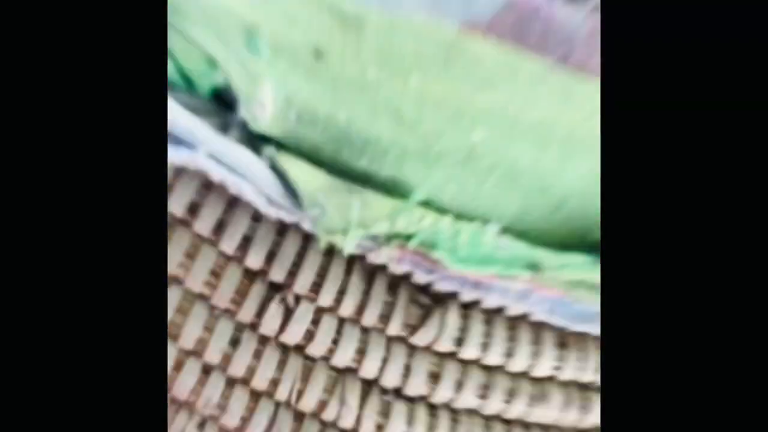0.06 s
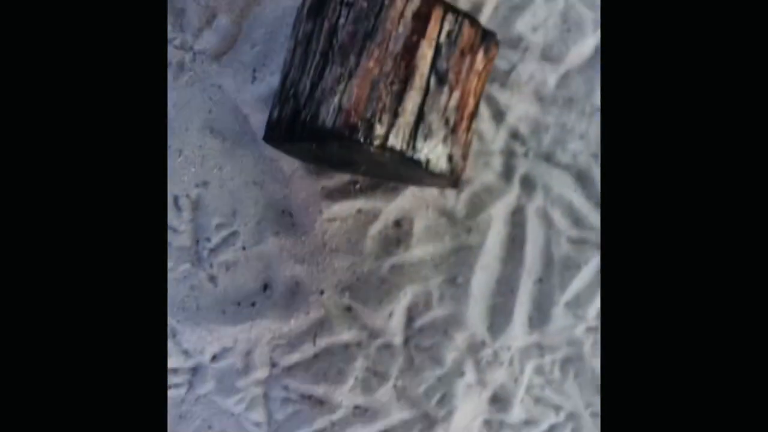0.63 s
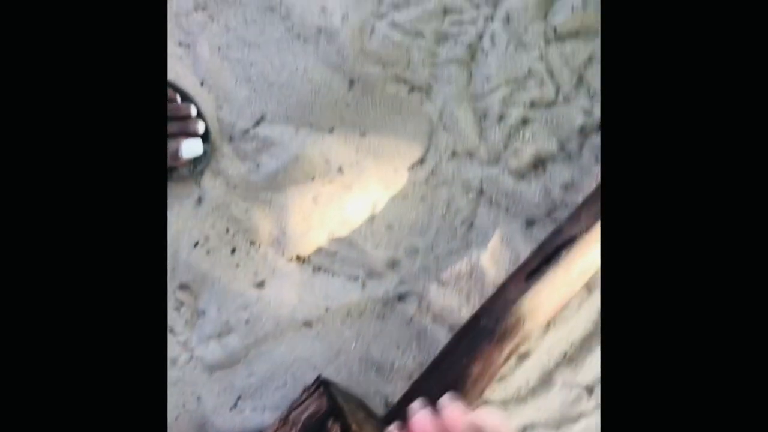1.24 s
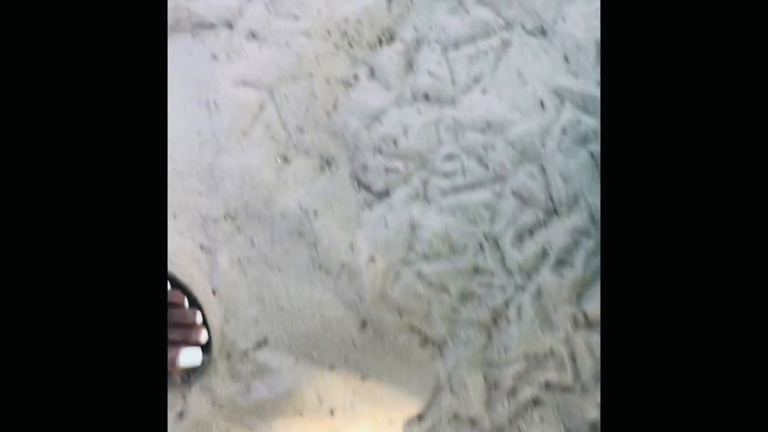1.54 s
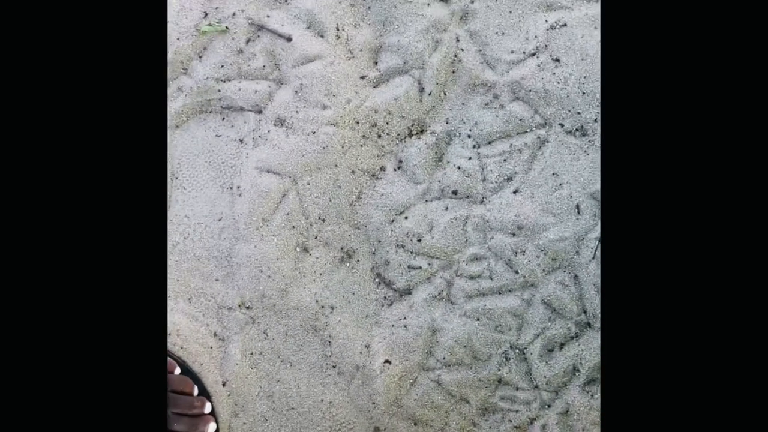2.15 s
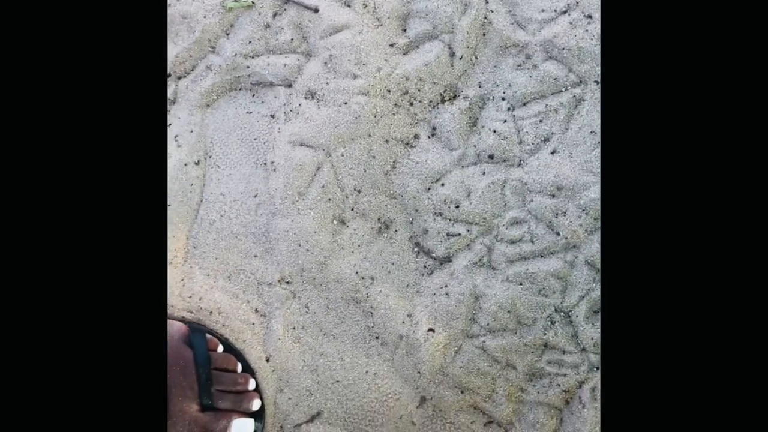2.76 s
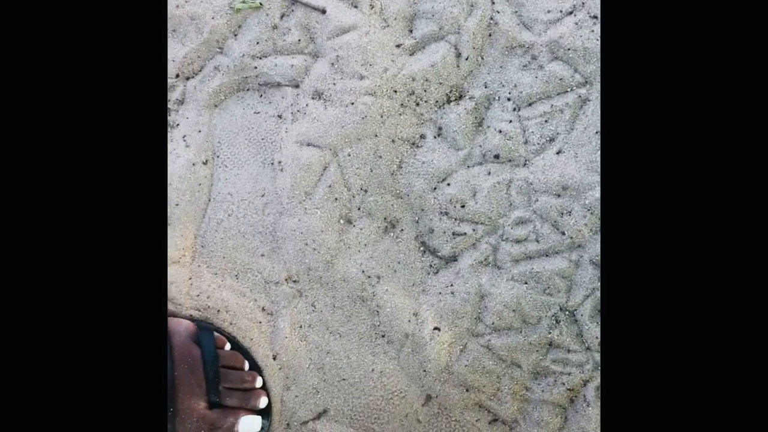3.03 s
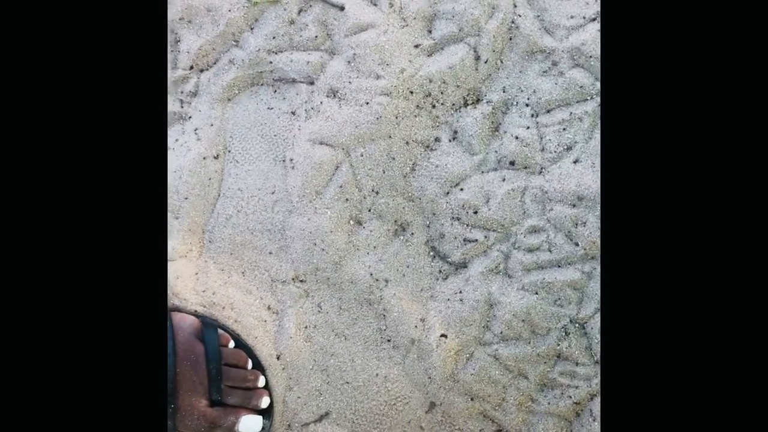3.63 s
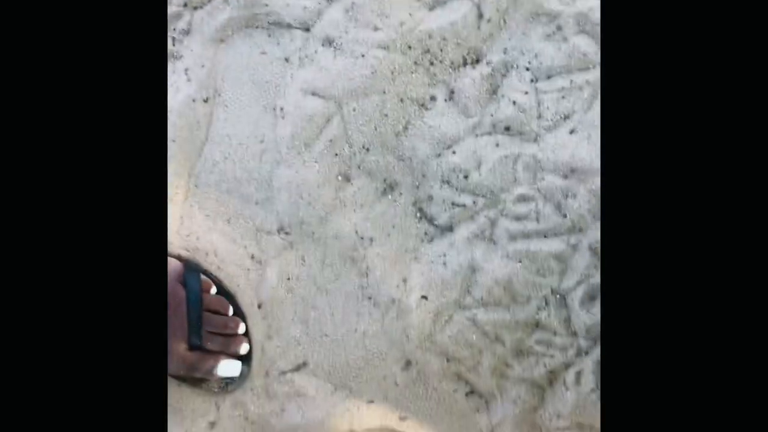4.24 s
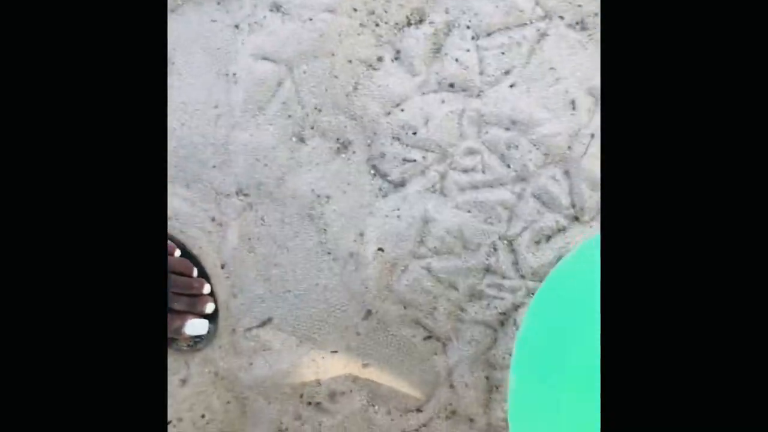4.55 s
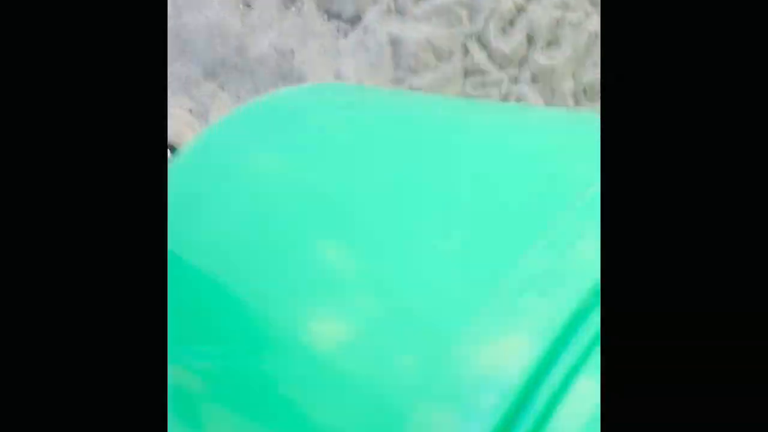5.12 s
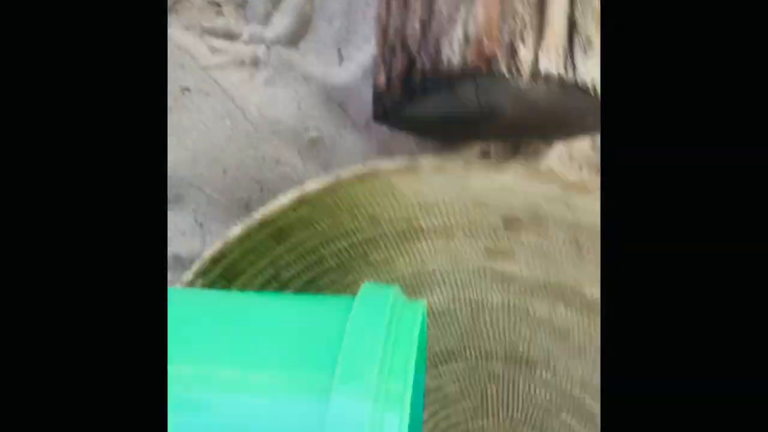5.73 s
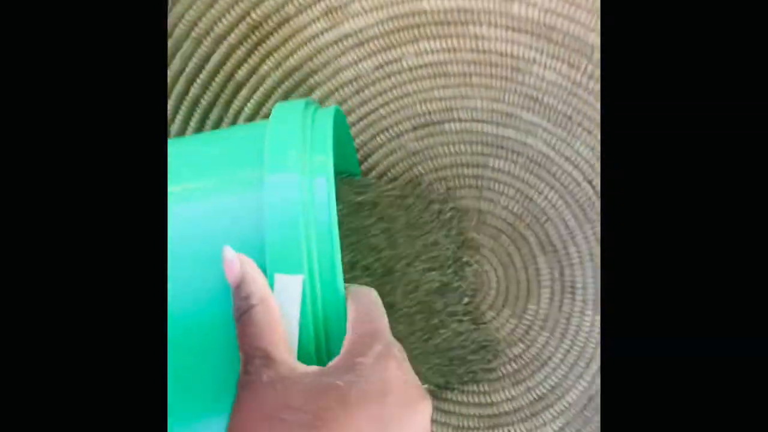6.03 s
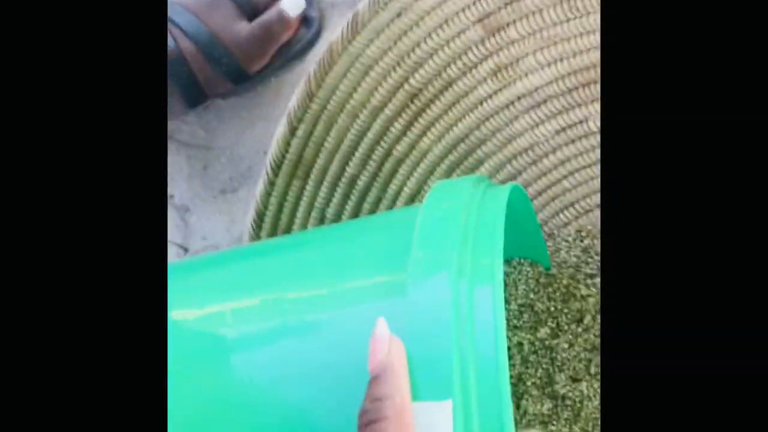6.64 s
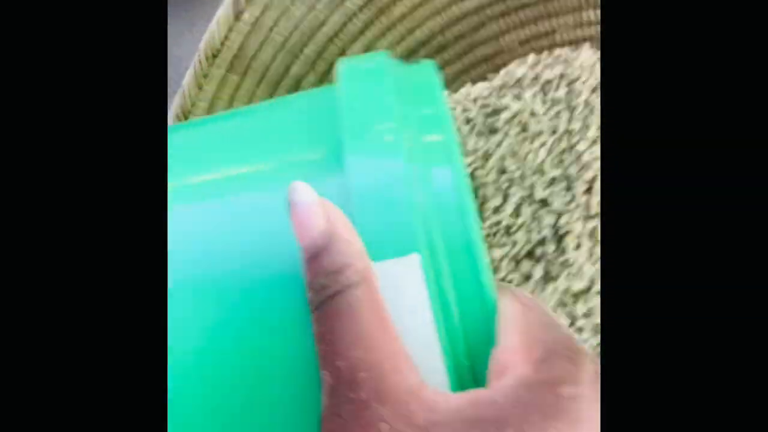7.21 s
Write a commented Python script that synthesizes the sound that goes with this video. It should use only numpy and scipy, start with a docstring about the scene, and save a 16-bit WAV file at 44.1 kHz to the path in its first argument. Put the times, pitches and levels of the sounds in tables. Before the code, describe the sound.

Light wind rumbles on a close microphone outdoors throughout. At about 0.3 seconds a woven grass basket is put down with a deep thump and a rustle of straw. A softer bump and rustle come near 1 second, then a sharp, squeaky snap at 1.4. From 2.1 to 2.9 seconds fingers knock irregularly on a plastic bucket, its thin wall booming, followed by small crackles. Around 3.5 seconds the bucket clatters in a quick run of hard hits, the loudest moment. A brief crackly scrape follows at 3.9 and a heavy, hollow thump at 4.6. From about 5.3 seconds wet grain starts sliding out with small ticks, surging into a hiss in the basket at 5.9. Lumps land with dull thuds until 6.5 and the flow thins. At 7.2 seconds the rest drops in one heavy slump with a bright hiss, fading by 7.5.

```python
"""Outdoors on sand, one microphone close to the work, light wind rumbling on it throughout.
A woven grass basket is put down with a thump and a rustle of straw. A plastic bucket is picked up:
its thin wall knocks and booms under the fingers, then it clatters and thumps. Last, wet millet
slides out of the tipped bucket, hisses into the basket and ends in one heavy slump."""
import sys
import numpy as np
from scipy import signal
from scipy.fft import rfft, irfft, next_fast_len
from scipy.io import wavfile
from scipy.ndimage import map_coordinates

SR = 44100
rng = np.random.default_rng(int(sys.argv[2]) if len(sys.argv) > 2 else 0)


def waveform_to_disk(signal):
    """Save audio, clipped to [-1, 1], as 16-bit WAV at the path in sys.argv[1]."""
    frames = np.transpose(np.atleast_2d(signal))
    scaled = np.clip(frames, -1, 1) * 32767
    samples = np.round(scaled).astype(np.int16)
    wavfile.write(sys.argv[1], SR, samples)


N = 329647


def amp(db):
    """Decibels to gain."""
    return 10 ** (np.asarray(db) / 20)


def unit(x):
    """Scale to rms 1."""
    return x / np.sqrt(np.mean(x ** 2) + 1e-20)


def along(points, hz):
    """Read (Hz, value) points on a log frequency axis."""
    point_hz, values = np.transpose(points)
    return np.interp(np.log(hz + 1), np.log(point_hz + 1), values)


def curves(rows):
    """One value per sample for each column after the time."""
    times, *columns = np.transpose(rows)
    return [np.interp(np.arange(N) / SR, times, column) for column in columns]


def wobble(rate):
    """A smooth random curve, rate knots a second."""
    knots = rng.standard_normal(int(N * rate / SR) + 4)
    return map_coordinates(knots, [np.arange(N) * rate / SR])


def filtered(x, gain):
    """x times a gain that depends on frequency."""
    size = next_fast_len(len(x) + 2048)
    return irfft(rfft(x, size) * gain(np.fft.rfftfreq(size, 1 / SR)), size)[:len(x)]


def resonance(x, centre_hz, q):
    """Pass x through one resonance of sharpness q."""
    width = centre_hz / q
    return filtered(x, lambda hz: 1j * hz * width / (centre_hz ** 2 - hz ** 2 + 1j * hz * width))


def noise_band(size, hz, q):
    """Noise passed twice through one resonance, rms 1."""
    return unit(resonance(resonance(rng.standard_normal(size), hz, q), hz, q))


def highpass(x, lowest_hz):
    """Roll off what lies below lowest_hz."""
    return signal.sosfilt(signal.butter(2, lowest_hz, "highpass", fs=SR, output="sos"), x)


def add(track, s, sound):
    """Mix a sound into a track at s seconds."""
    start = int(np.clip(round(s * SR), 0, N - 1))
    track[start:start + len(sound)] += sound[:N - start]


def dying_noise(decay, size):
    """Noise of equal energy per frequency, each frequency dying at its own speed."""
    hz, t, spectra = signal.stft(rng.standard_normal(size), SR, nperseg=128)
    t60 = along(decay, hz)[:, None]
    fade = amp(-60 * t / t60) * np.sqrt(np.log(1e6) / (t60 * SR))
    return signal.istft(spectra * fade, SR, nperseg=128)[1][:size]


def ringing(modes, attack_s, scatter_db):
    """Damped (Hz, dB, t60 s) modes, struck at new strengths every time."""
    t = np.arange(SR // 4) / SR
    hz, db, t60 = np.transpose(modes)[:, :, None]
    fade = amp(db + scatter_db * rng.standard_normal(hz.shape) - 60 * t / t60)
    return np.sum(fade * np.sin(2 * np.pi * hz * t), axis=0) * (1 - np.exp(-t / attack_s))


# Wind on the microphone. Each row: time in seconds, relative level in dB.
WIND_LEVELS = [(0.0, -50), (1.95, -50.5), (2.58, -44), (3.62, -38.5), (4.35, -53.5), (4.83, -43),
               (5.53, -53), (6.41, -44.5), (7.47, -43.5)]
# Its rumble. Each row: frequency in Hz, level in dB.
WIND_SPECTRUM = [(13, -44.5), (22, -30), (48, -3), (70, -1), (106, -2.5), (231, -13.5), (255, -29.5),
                 (300, -14), (390, -60.5), (660, -120)]


def wind(gain_db=3, lumps_db=2.0):
    """Air buffets the microphone with a low, lumpy rumble."""
    db, = curves(WIND_LEVELS)
    rumble = filtered(rng.standard_normal(N), lambda hz: amp(along(WIND_SPECTRUM, hz)))
    return amp(db + gain_db) * unit(rumble * amp(lumps_db * wobble(15)))


# The yard around the microphone. Each row: frequency in Hz, echo t60 in seconds.
YARD_DECAY = [(150, 0.98), (600, 0.24), (3000, 0.18), (12000, 0.2)]


def yard_echoes(hits, level_db=-18.5):
    """The open yard scatters a little of each hit back."""
    echoes = signal.fftconvolve(hits, dying_noise(YARD_DECAY, size=SR // 2))[:N]
    return amp(level_db) * highpass(echoes, lowest_hz=220)


def grains(rate):
    """Random tiny impacts of widely varying size, rate a second, rms 1."""
    sizes = amp(5 * np.clip(rng.standard_normal(N), -2, 2)) * rng.choice([-1, 1], N)
    return unit((rng.random(N) < rate / SR) * sizes)


# The basket's low body and the rustle above it. Each row: frequency in Hz, level in dB.
BODY_SPECTRUM = [(120, -11), (240, 3.5), (400, 1.5), (800, -4.5), (1100, -9.5), (1800, -71)]
RUSTLE_SPECTRUM = [(600, -17), (1000, -3), (1300, 4), (1550, 1), (1850, 0), (2400, -1.5), (3600, -1),
                   (4500, -3), (5600, -8), (8500, -51.5)]


def patter(levels_db, fizz_spectrum, rate, single_db, flutter_db):
    """Single grains over a blur of many, heard in three bands: body, rustle and fizz."""
    impacts = amp(single_db) * grains(rate)
    clumps = amp(flutter_db * wobble(70))
    out = np.zeros(N)
    for db, spectrum in zip(levels_db, (BODY_SPECTRUM, RUSTLE_SPECTRUM, fizz_spectrum)):
        drive = (impacts + rng.standard_normal(N)) * clumps
        out += amp(db) * unit(filtered(drive, lambda hz: amp(along(spectrum, hz))))
    return out


# The yard's still air: levels of body, rustle and fizz in dB.
STILL_AIR_DB = [-56, -62, -64]
# Strokes over straw, cloth and sand, close by. Each row: peak time in seconds, rustle level in dB,
# rise and fall in seconds, brightness in dB (more fizz, less body).
STROKES = [(0.04, -45, 0.12, 0.041, 6), (0.19, -58, .08, 0.13, 12.5), (0.273, -35.5, 0.012, 0.099, 3.5),
           (1.0, -57, 0.8, 0.7, 7), (1.057, -36, 0.043, 0.024, 6.5), (1.16, -38, .008, 0.01, 7.5),
           (1.24, -44, 0.051, 0.06, 3), (1.5, -51.5, .03, 0.15, 1), (2.17, -52, 0.045, 0.1, -11),
           (2.739, -40, 0.067, 0.036, -2), (2.84, -42.5, 0.047, 0.055, -14.5), (3.04, -44, 0.16, 0.2, -3),
           (3.92, -35.5, 0.0094, 0.016, -6), (4.07, -44, 0.07, 0.061, -0.5), (4.38, -53.5, 0.2, 0.1, 0.5),
           (4.648, -39, 0.016, 0.11, -0.5), (5.1, -56.5, 0.13, 0.23, -0.5),
           (6.779, -46.5, 0.031, 0.043, -16)]
# The fizz of dry straw. Each row: frequency in Hz, level in dB.
STRAW_FIZZ = [(4000, -10.5), (6500, 0), (9000, -3.5), (12000, -6.5), (15500, -1)]


def straw_rustle(fizz_db=-1.5):
    """Each stroke swells and dies away over the still air as a sparse crackle of straw and sand."""
    t = np.arange(N) / SR
    power = amp(STILL_AIR_DB)[:, None] ** 2 * np.ones(N)
    for s, db, rise, fall, bright_db in STROKES:
        from_peak = np.maximum((s - t) / rise, (t - s) / fall)
        swell = np.exp(-np.minimum(from_peak, 20))
        band_gains = amp([db - bright_db, db, db + fizz_db + bright_db])
        power += np.outer(band_gains ** 2, swell ** 2)
    return patter(10 * np.log10(power), STRAW_FIZZ, rate=340, single_db=-7.0, flutter_db=1.3)


def hum(partials, t60, width_hz):
    """A rough, fading ring: narrow noise around each partial."""
    bands = sum(amp(db) * noise_band(SR, hz, q=hz / width_hz) for hz, db in partials)
    return bands * amp(-60 * np.arange(SR) / SR / t60)


# Faint rings of the basket and of a touch. Each row: frequency in Hz, relative level in dB.
BASKET_PARTIALS = [(894, 6.5), (1850, -20), (2789, -14), (4200, -10), (6363, -12)]
TOUCH_PARTIALS = [(528, 8.5), (1185, -4), (1800, 1.5), (2929, -13), (3838, -13), (4005, -4), (4587, -12.5),
                  (4899, -7.5), (6449, -12.5), (7407, -13), (8156, -8)]


def lingering_rings():
    """The basket hums as it settles; later a ring lingers after the last finger knock."""
    out = np.zeros(N)
    add(out, 0.31, amp(-43) * hum(BASKET_PARTIALS, t60=0.6, width_hz=110))
    add(out, 2.886, amp(-48) * hum(TOUCH_PARTIALS, t60=1.1, width_hz=220))
    return out


# Short swells of band noise. Each row: peak time in seconds, level in dB,
# half length in seconds, centre in Hz, relative sharpness.
NOISE_SWELLS = [(0.012, -48.5, 0.0057, 830, 2.2), (0.328, -33.5, 0.017, 463, 1.6),
                (1.138, -26.5, 0.0016, 1390, 2.2), (1.459, -45, 0.041, 2870, 6.3),
                (2.139, -26, 0.0027, 5970, 0.66), (2.242, -18, 0.0019, 3800, 0.94),
                (2.246, -16.5, 0.0035, 850, 1.9), (2.48, -27.5, 0.0013, 7000, 1),
                (2.527, -10.5, 0.0014, 1680, 1.2), (2.663, -28, 0.0021, 3000, 0.85),
                (2.526, -9, 0.0005, 4370, 9.9), (2.878, -35, 0.011, 8050, 0.43),
                (2.886, -24, 0.0032, 2150, 4.1), (3.464, -25, 0.0037, 3070, 0.15),
                (3.922, -25, 0.012, 1780, 0.72), (4.071, -45, 0.042, 1400, 2.3),
                (4.627, -16.5, 0.0072, 330, 1.26), (4.693, -32.5, 0.049, 308, 2.04),
                (6.769, -31.5, 0.032, 1340, 2), (7.219, -19, 0.023, 1400, 1.5),
                (7.264, -20.5, 0.015, 3180, .65)]


def noise_swells():
    """Bands of noise swell and fade: scrapes, and brief bright hisses that soften the knocks' onsets."""
    out, t = np.zeros(N), np.arange(-SR // 10, SR // 10) / SR
    for s, db, half_length, hz, sharpness in NOISE_SWELLS:
        band = noise_band(len(t), hz, q=1.1 * sharpness)
        add(out, s + t[0], amp(db) * band * np.exp(-(t / half_length) ** 2 / 2))
    return out


# Spells of crackle. Each row: start, end and mean gap in seconds, relative level in dB.
CRACKLE_SPELLS = [(0.264, 0.323, 0.016, -31), (2.793, 2.88, 0.013, -22.5), (4.681, 4.88, 0.017, -30.5),
                  (4.88, 5.394, .022, -37), (5.405, 5.605, .014, -31)]


def crackle(count=24, centre_hz=2800, spread_octaves=0.7, scatter_db=5.5):
    """Straw settles, a hand shifts, grain creeps: unevenly spaced ticks, as rows (s, dB, Hz)."""
    rows = []
    for start, end, gap, db in CRACKLE_SPELLS:
        spacing, size, pitch = rng.uniform(-1, 1, (count, 3)).T
        times = start + gap * (np.arange(count) + (1 + spacing) / 2)
        levels_db = np.where(times < end, db + scatter_db * size, -np.inf)
        rows += zip(times, levels_db, centre_hz * 2 ** (spread_octaves * pitch))
    return rows


# Single ticks, clear at this distance. Each row: start in seconds, relative level in dB, centre in Hz.
TICKS = [(0.619, -38, 9000), (0.851, -36, 7140), (1.036, -23, 3520), (1.794, -32.5, 1600),
         (2.757, -18.5, 2480), (2.791, -18.5, 2160), (2.828, -25, 2500), (2.997, -26.5, 2500),
         (3.042, -16.5, 3070), (3.081, -18.5, 1880), (3.888, -22.5, 2130), (3.915, -16, 1350),
         (3.923, -12.5, 3320), (3.967, -25.5, 1480), (4.287, -34, 3320), (4.823, -26.5, 2500),
         (5.242, -30, 3650), (5.266, -23, 2800), (5.521, -17, 3400), (5.545, -15.5, 2670),
         (6.267, -22, 3030), (7.454, -10.5, 5340)]


def ticks(t60=0.013, gain_db=1):
    """Straw, nails and grains make tiny snaps, each with its own brightness."""
    out, t = np.zeros(N), np.arange(SR // 20) / SR
    for s, db, hz in TICKS + crackle():
        burst = rng.standard_normal(len(t)) * amp(-60 * t / t60)
        snap = highpass(resonance(burst, hz, q=2.2), lowest_hz=820)
        add(out, s, amp(db + gain_db) * snap / np.abs(snap).max())
    return out


# The bands of a blow in Hz, from thud up to fizz.
BLOW_BANDS_HZ = [120, 450, 1000, 1900, 2900, 4400, 11000]
# The rattle after a blow. Each row: frequency in Hz, t60 in seconds.
RATTLE_DECAY = [(100, 0.093), (450, 0.024), (1600, 0.015), (5000, 0.013), (14000, 0.02)]


def blow(bands_db, lag_cycles, rattle_db, lowest_hz, size=8192):
    """One contact on a flexing wall: treble arrives first, bass some cycles later, with a short rattle."""
    hz = np.fft.rfftfreq(size, 1 / SR)
    gain = amp(along(list(zip(BLOW_BANDS_HZ, bands_db)), hz))
    gain /= np.sqrt(1 + (lowest_hz / (hz + 1)) ** 8)
    cepstrum = irfft(np.log(gain + 1e-4))
    minimum_phase = np.exp(rfft(np.r_[cepstrum[0], 2 * cepstrum[1:size // 2]], size))  # a sharp onset
    bending = np.exp(-2j * np.pi * lag_cycles * np.log(hz + lowest_hz / 2))
    build_up = 1 - np.exp(-np.arange(size) / (0.00071 * SR))  # waves return from the rim
    rattle = amp(rattle_db) * rfft(build_up * dying_noise(RATTLE_DECAY, size))
    fade_out = np.minimum(1, np.linspace(10, 0, size))
    return irfft(minimum_phase * bending * (1 + rattle)) * fade_out


# A sticking edge, close by. Each row: peak time in seconds, level in dB, pitch in Hz.
SQUEAKS = [(1.4047, -3, 2980)]
# The ring as it snaps free. Each row: frequency in Hz, level in dB, t60 in seconds.
SNAP_MODES = [(530, -5.5, .022), (1480, 1, 0.01), (1943, -7, 0.0065), (2350, -14, 0.0041),
              (2520, -0.5, 0.0098), (3000, -14, .016)]
# The snap's blow: level in dB in each band.
SNAP_COLOUR = [13, 14, 7, 28.5, 25.5, 14, 1]


def squeak(swell_s=0.0011, lead_s=0.0069, lead_db=-21):
    """Stick-slip sings thinly, swells within milliseconds and lets go with a dry snap."""
    out, t = np.zeros(N), np.arange(-SR // 20, SR // 20) / SR
    for s, db, hz in SQUEAKS:
        grip = np.exp(-np.abs(t) / swell_s) + amp(lead_db) * np.exp(-(t / lead_s) ** 2 / 2)
        add(out, s + t[0], amp(db) * grip * np.sin(2 * np.pi * hz * t))
        add(out, s, ringing(SNAP_MODES, attack_s=0.0004, scatter_db=0.5))
        add(out, s, blow(SNAP_COLOUR, lag_cycles=1.2, rattle_db=-4.5, lowest_hz=95))
    return out


# Thumps of basket, ground and lumps of grain, near the microphone. Each row: start in seconds,
# strength in dB, extra bass in dB, cut-off in Hz, hollow ring in dB.
THUMPS = [(0.259, 19, 20.5, 6950, -6), (0.311, 1, -2, 3000, -29), (1.051, 9, 19, 430, -42),
          (4.614, 31, 3.5, 1770, 4), (5.556, 8.5, -14, 2500, -38), (5.623, 2.5, -2, 1500, -33),
          (5.882, 21.5, -18, 1490, -19.5), (6.312, 12, 1, 700, -23), (6.332, 9, -9, 5140, -16),
          (6.422, 4, 7, 1600, -37), (6.470, 16.5, -10, 780, -18), (7.205, 14, 17.5, 900, -21),
          (7.219, 26, 0.5, 2200, -3.5)]
# A thump's colour: relative level in dB in each band.
THUMP_COLOUR = [-0.5, 3, -5.5, -3, -1.5, -9, -6]
# The basket's hollow. Each row: frequency in Hz, relative level in dB, t60 in seconds.
HOLLOW_MODES = [(222, -11.5, .08), (259, -2, 0.065), (321, 0.5, 0.039), (440.4, -6, 0.031),
                (833, -13.5, 0.034), (1690, -1.5, 0.0047)]


def thumps(steepness=5.43):
    """Heavy, dead blows ring the basket's hollow; the softer the contact, the duller the blow."""
    blows, hollows = np.zeros(N), np.zeros(N)
    hz = np.array(BLOW_BANDS_HZ)
    for s, db, bass_db, cut_hz, hollow_db in THUMPS:
        softness_db = 10 * np.log10(1 + (hz / cut_hz) ** steepness)
        bands_db = db + bass_db * (hz == hz[0]) - softness_db + THUMP_COLOUR
        add(blows, s, blow(bands_db, lag_cycles=1.6, rattle_db=1, lowest_hz=60.4))
        hollow = ringing(HOLLOW_MODES, attack_s=0.00088, scatter_db=3)
        add(hollows, s + 0.002176, amp(hollow_db) * hollow)
    return blows + highpass(hollows, lowest_hz=121)


# The bucket's shell. Each row: frequency in Hz, relative level in dB, t60 in seconds.
SHELL_MODES = [(379.3, -2, 0.22), (523, 2, 0.1), (664.3, -7.5, .13), (826, 2, 0.092), (890, 5.5, 0.077),
               (1040, -10.5, 0.071), (1093, -10, 0.081), (1340, -10.5, .077), (1672, -6, 0.03),
               (1850, -0.5, 0.035), (1977, -0.5, 0.053), (2032, -9, 0.031), (4370, -26, 0.028),
               (4737, -25, .04)]


def strike_shell(track, s, bands_db, ring_db):
    """Add one blow on the plastic and the ring that it sets off."""
    add(track, s, blow(bands_db, lag_cycles=1.2, rattle_db=0.5, lowest_hz=95.8))
    add(track, s, amp(ring_db) * ringing(SHELL_MODES, attack_s=0.0018, scatter_db=3.5))


# Fingers on the bucket, close up. Each row: start in seconds, strength in dB, tilt in dB per octave.
KNOCKS = [(2.062, -1.5, 0), (2.131, 13.5, -2.5), (2.1401, 18, -1.5), (2.21, 12, -2.5), (2.241, 16, 0.5),
          (2.471, 10, -1.5), (2.481, 5.5, 2), (2.525, 19.5, -0.5), (2.661, 11, 0.5), (2.747, 12.5, -.5),
          (2.886, 11.5, 0)]
# A knock's colour: relative level in dB in each band.
KNOCK_COLOUR = [5.5, 0, -6, -8, -16.5, -9, -29]


def finger_knocks(ring_db=-53):
    """Fingers knock on the bucket's wall: a nail is bright, a fingertip dull."""
    out = np.zeros(N)
    octaves = np.maximum(np.log2(np.array(BLOW_BANDS_HZ) / BLOW_BANDS_HZ[1]), 0)
    for s, db, tilt in KNOCKS:
        strike_shell(out, s, db + tilt * octaves + KNOCK_COLOUR, db + ring_db)
    return out


# The bucket clatters near the microphone. Each row: start in seconds, strength in dB,
# flight in seconds, then rebound and shell ring in dB relative to the hit.
CLATTER = [(3.468, 34, 0.014, -27, -56), (3.554, 33.5, .0105, -16, -43.5), (3.589, 30.5, .014, -6.5, -51.5),
           (3.642, 28, .016, -5, -44.5), (3.696, 15, .012, -25, -53)]


def bucket_clatter(hard_db=32):
    """Each hit rebounds once; the harder the contact, the brighter it is."""
    hard_colour_db = np.array([12.5, 33, 27, 28, 11, 12, -3.5])  # each band at strength hard_db
    growth = np.array([0.83, 1.1, 0.97, 1.06, 1.73, 2.24, 3.9])  # dB per dB of strength
    out = np.zeros(N)
    for s, db, flight, rebound_db, ring_db in CLATTER:
        for at, hit_db in ((s, db), (s + flight, db + rebound_db)):
            strike_shell(out, at, hard_colour_db + (hit_db - hard_db) * growth, hit_db + ring_db)
    return out


# The bucket's wall, close up. Each row: start in seconds, relative level in dB, pitch in Hz.
BOOMS = [(2.065, -12, 118), (2.145, -6.5, 136.4), (2.208, -12, 173), (2.480, -6.5, 112), (2.532, -6, 132.5),
         (2.666, -9, 163.6), (3.134, -19, 152), (3.29, -20, 150), (6.596, -26.5, 112)]


def wall_booms(t60=0.09, gain_db=6):
    """Pressed and released, the thin wall flexes and booms in two low modes."""
    out = np.zeros(N)
    for s, db, hz in BOOMS:
        modes = [(hz, 0, t60), (hz * 1.537, -10, t60 * 0.84)]
        add(out, s, amp(db + gain_db) * ringing(modes, attack_s=0.014, scatter_db=2.5))
    return highpass(out, lowest_hz=70)


def stray_grains(flow_db, rate=60, ceiling_db=-33, gain_db=-10, t60=0.0078):
    """Lone grains tick against the bucket's lip, louder with the flow up to a ceiling."""
    t = np.arange(SR // 100) / SR
    click = resonance(rng.standard_normal(len(t)) * amp(-60 * t / t60), 3600, q=2.2)
    clicks = unit(signal.fftconvolve(grains(rate), click)[:N])
    return amp(np.minimum(flow_db, ceiling_db) + gain_db) * clicks


# The pour, close to the microphone. Each row: time in seconds, flow and treble as relative levels in dB.
POUR = [(5.2, -49.5, -68), (5.34, -49.5, -62), (5.55, -34.5, -50), (5.6, -37.5, -48), (5.83, -32.5, -44.5),
        (5.92, -19.5, -26.5), (6.25, -40, -50.5), (6.32, -35.5, -41), (6.36, -41, -54), (6.64, -55.5, -63),
        (6.77, -43.5, -54), (6.84, -48.5, -57), (6.88, -37, -39), (7.15, -40.5, -52.5), (7.22, -17.5, -25),
        (7.33, -24, -23.5), (7.34, -22.5, -13.5), (7.47, -31.5, -47)]
# The fizz of wet millet. Each row: frequency in Hz, level in dB.
MILLET_FIZZ = [(4000, -23), (6600, 1.5), (8200, -2), (10000, -5.5), (12500, -9), (15500, -4.5)]


def millet_pour(body_db=-9.5, rustle_db=-1.5, fizz_db=1):
    """Dense impacts of wet millet hiss into the basket, whose body sounds with the flow."""
    fade_in, = curves([(5.18, 0), (5.22, 1)])
    flow_db, treble_db = curves(POUR)
    levels_db = flow_db + body_db, flow_db + rustle_db, treble_db + fizz_db
    hiss = patter(levels_db, MILLET_FIZZ, rate=2600, single_db=-1, flutter_db=1.63)
    return fade_in * (hiss + stray_grains(flow_db))


def scene():
    """All sources at one close microphone; only the short sounds echo in the yard."""
    bucket = finger_knocks() + bucket_clatter() + wall_booms()
    hits = bucket + thumps() + squeak() + ticks() + noise_swells()
    return (hits + yard_echoes(hits) + lingering_rings() + straw_rustle() + millet_pour() + wind())[None]


def record(dry, lowest_hz=32, top_hz=15900):
    """The loudest blows clip softly at full scale; the deepest bass and highest treble are cut."""
    clipped = dry[0] / (1 + np.abs(dry[0]) ** 10) ** (1 / 10)
    bass_cut = filtered(clipped, lambda hz: 1 / np.sqrt(1 + (lowest_hz / (hz + 1)) ** 6))
    return filtered(bass_cut, lambda hz: 1 / (1 + (hz / top_hz) ** 160))[None]


dry = scene()
out = record(dry)
waveform_to_disk(out)
```